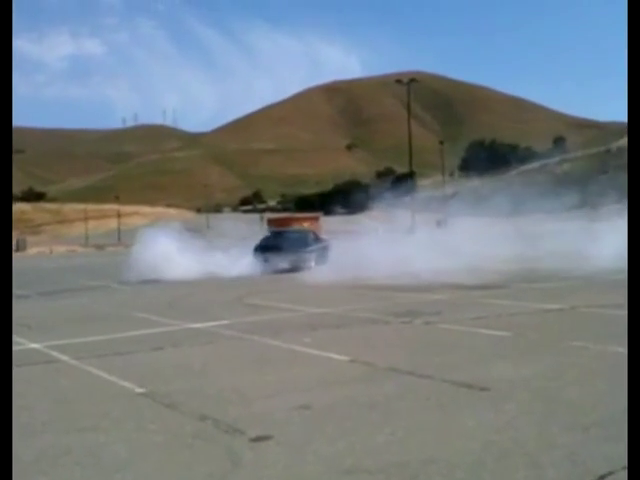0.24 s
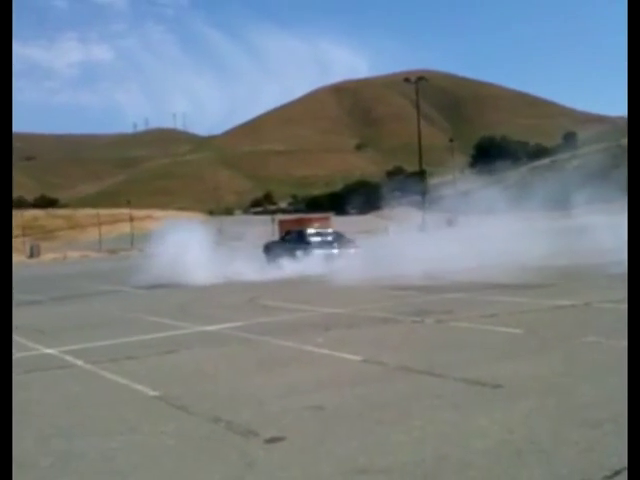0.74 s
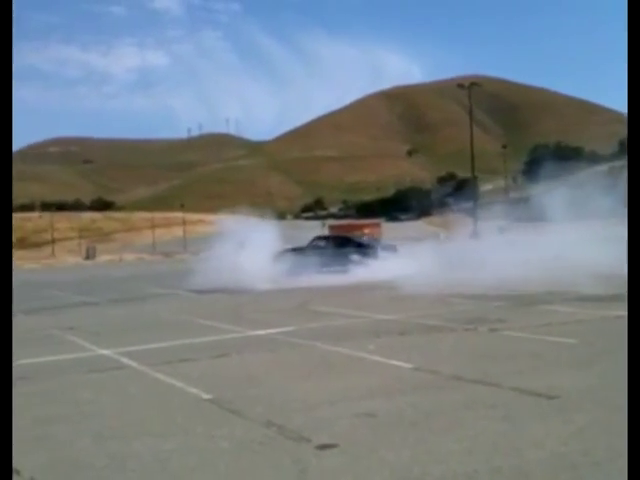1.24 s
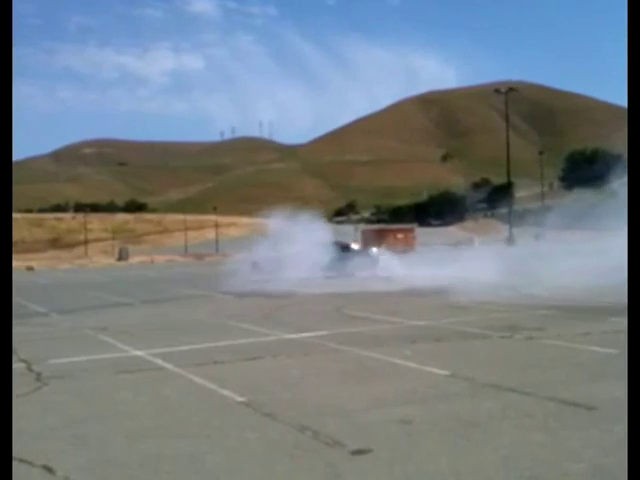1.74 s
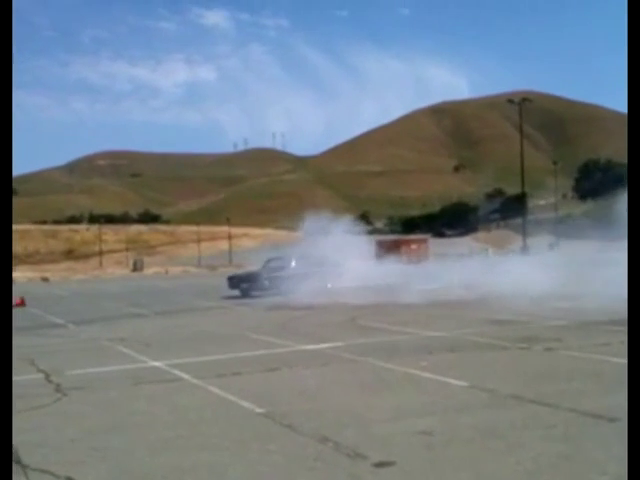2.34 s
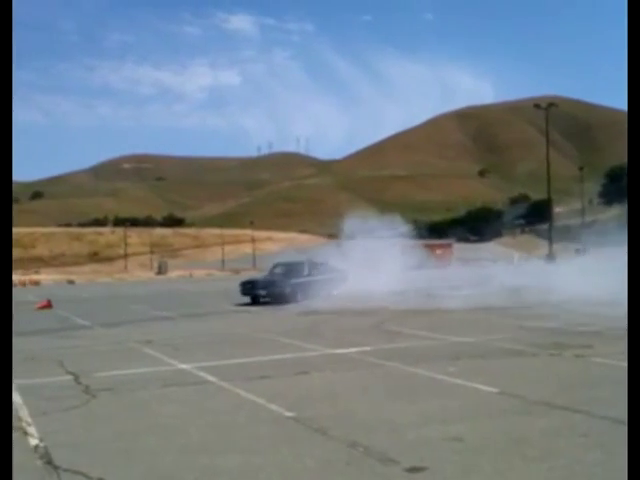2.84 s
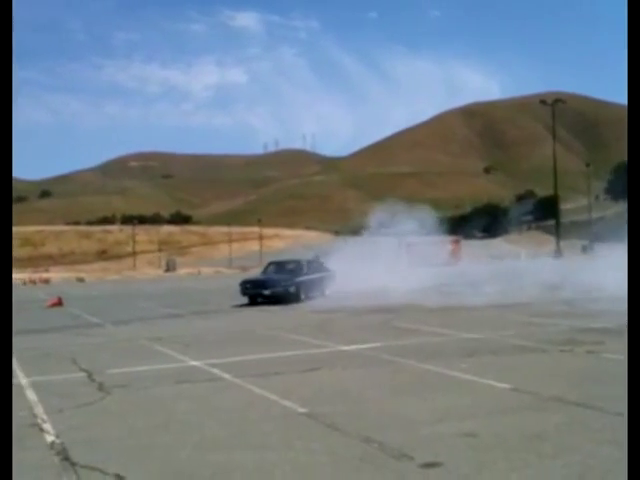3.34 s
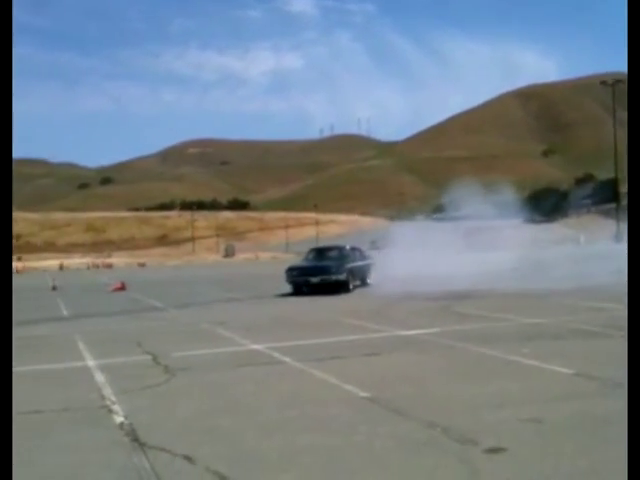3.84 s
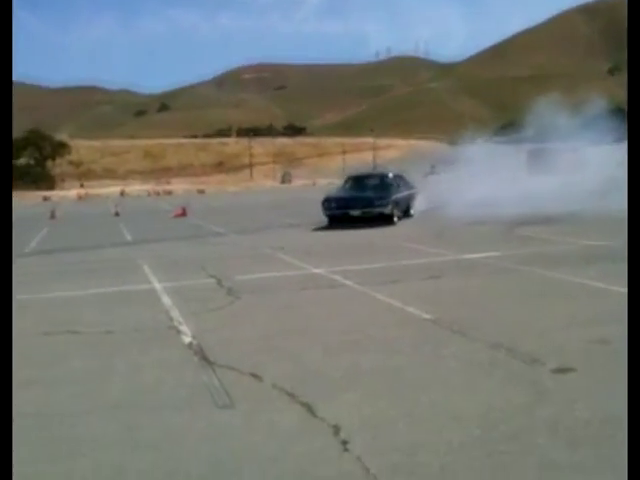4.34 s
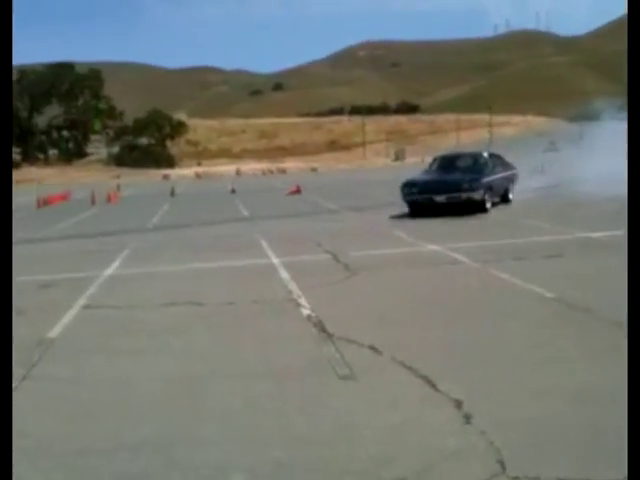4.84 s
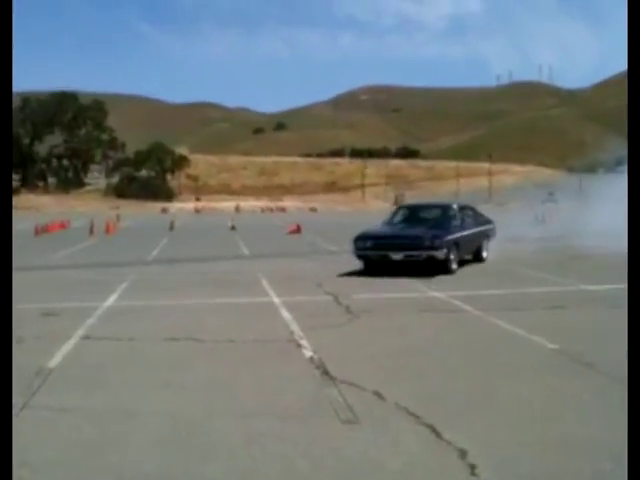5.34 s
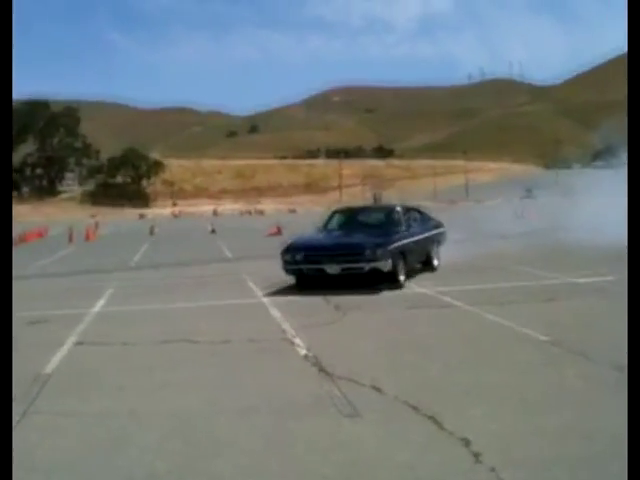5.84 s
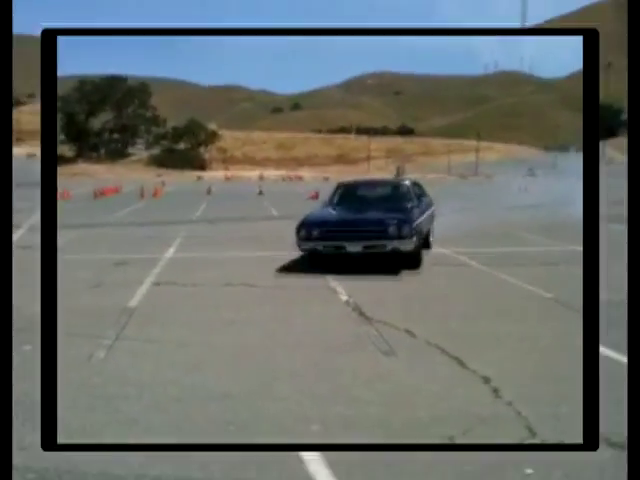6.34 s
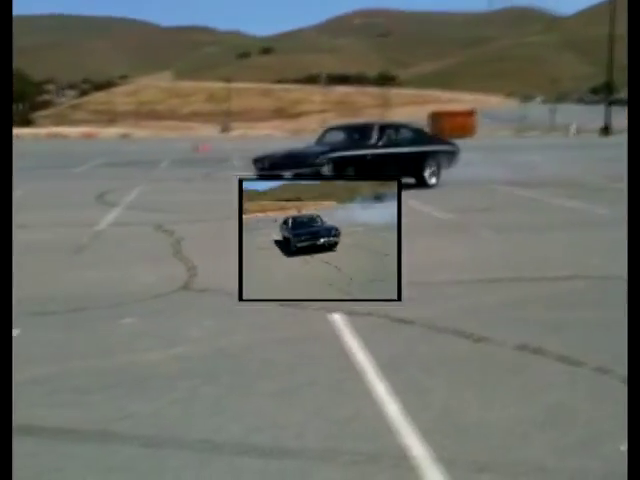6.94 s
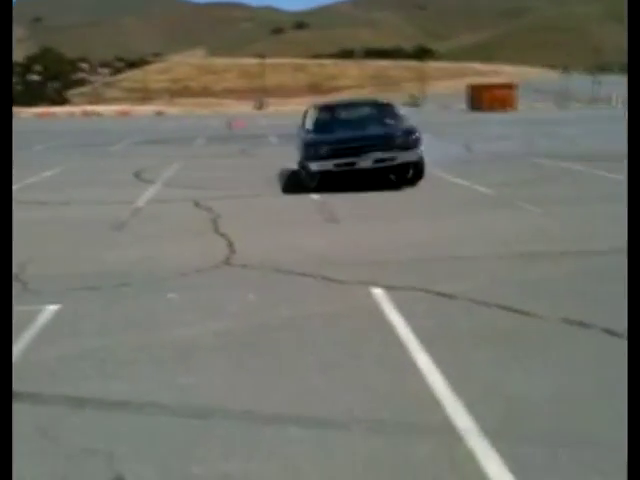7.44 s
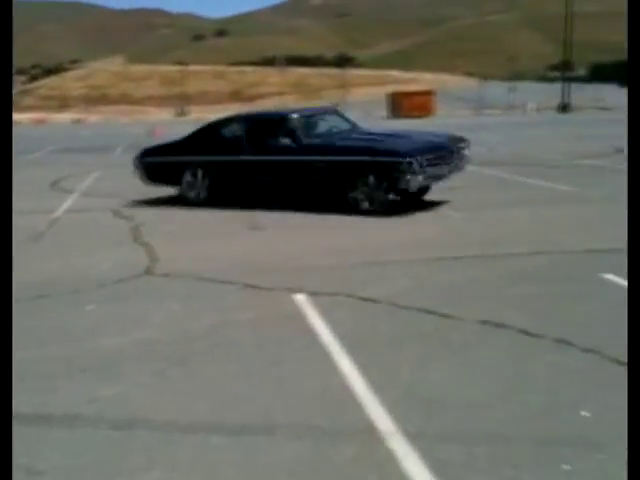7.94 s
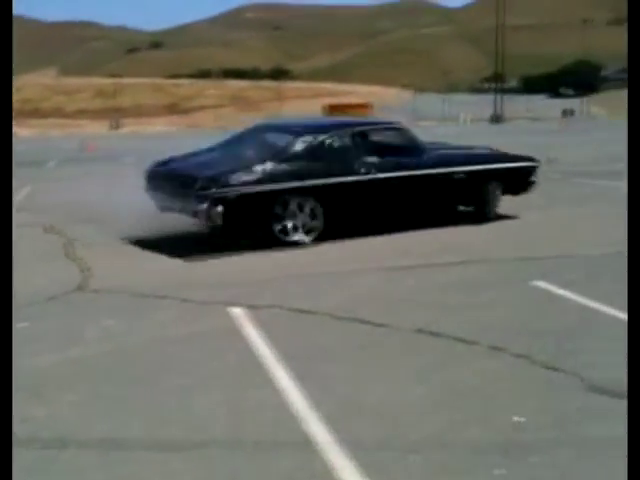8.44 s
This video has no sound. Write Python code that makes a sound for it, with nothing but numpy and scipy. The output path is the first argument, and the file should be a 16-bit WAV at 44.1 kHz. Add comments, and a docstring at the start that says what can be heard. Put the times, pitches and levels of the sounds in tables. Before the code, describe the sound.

Outdoors on an open asphalt lot, heard through a small, bass-light microphone. From 0 to about 1.4 s a V8 burbles at high steady revs while spinning tyres squeal around 800 Hz in overlapping, rough, wavering swells, with scrubbing roar and early rubber crackle. From 1.5 to 2.2 s the revs fall and the squeal weakens into quick chirps. Until 3.1 s only a faint idle and airy wash remain, with a soft hollow knock near 2.6 s. The throttle blips at 3.3-4.2 s, then low thumping idle continues, with tiny close ticks around 5 s and a brief rustle at 5.5 s. A sharper tick at 6.3 s precedes a sudden throttle surge. Short squeals come first; from 7.3 s longer screeches join a climbing engine and swelling gritty roar. The car sweeps close from 8 s, distorting, loudest as it ends at 8.7 s.

```python
"""A V8 car spins its rear tyres on an open asphalt lot, backs off to a far idle and blips the throttle; then a
car slides past close to the microphone with the engine climbing. The exhaust is a sum of engine-cycle orders,
the idle a train of ringing thumps, the squeals gliding tones of wavering strength, the roar and the open air
coloured noise. Chirps, snaps, ticks, a rustle and a knock are short tones and noise; a small microphone clips
the loudest peaks."""
import sys
import numpy as np
from scipy import signal
from scipy.fft import next_fast_len
from scipy.io import wavfile
from scipy.ndimage import uniform_filter1d

SR = 44100
rng = np.random.default_rng(int(sys.argv[2]) if len(sys.argv) > 2 else 0)


def output_pcm(signal):
    """Save a mono or channel-first signal as 16-bit PCM at the path in sys.argv[1].

    Samples are clipped to [-1, 1] before scaling.
    """
    pcm = np.clip(np.atleast_2d(signal).T, -1, 1) * 32767
    wavfile.write(sys.argv[1], SR, np.round(pcm).astype(np.int16))


N = 383211


def gain_of(db):
    """Decibels to gain."""
    return 10 ** (np.asarray(db) / 20)


def evened(x):
    """Scales to rms 1."""
    return x / np.sqrt(np.mean(abs(x) ** 2) + 1e-20)


def read(points, hz):
    """Reads a spectrum on a log-frequency axis."""
    f, value = np.transpose(points)
    return np.interp(np.log(hz + 1), np.log(f + 1), value)


def unfold(rows):
    """Start time and every further column of a table at each sample."""
    s, *columns = np.transpose(rows)
    t = np.arange(s[0], s[-1], 1 / SR)
    return s[0], [np.interp(t, s, c) for c in columns]


def add(mix, s, sound):
    """Mixes a sound in at time s."""
    part = mix[round(s * SR):][:len(sound)]
    part += sound[:len(part)]


def wander(count, width):
    """Complex noise of rms 1 whose spectrum is a bell of the given width in Hz."""
    size = next_fast_len(count)
    hz = np.fft.fftfreq(size, 1 / SR)
    bell = 1 / (1 + (2 * hz / width) ** 2)
    white = rng.standard_normal(size) + 1j * rng.standard_normal(size)
    return evened(np.fft.ifft(bell * white))[:count]


def coloured(db_field):
    """Noise from random short-time spectra under a field of levels, bins by frames."""
    a, b = rng.standard_normal(db_field.shape[::-1] + (2,)).T
    spectra = (a + 1j * b) * gain_of(db_field)
    return signal.istft(spectra, nperseg=1024, noverlap=768)[1][:N] / np.sqrt(384)


# Speed of the engine, eight firings to a cycle. Each row: time in seconds, cycles per second.
ENGINE_SPEED = [(0, 20.25), (1.06, 20.1), (1.5, 19.65), (1.62, 18.8), (1.93, 15.4), (2.1, 13.8),
                (3.3, 12.2), (3.48, 13.5), (3.76, 14.95), (4.05, 15.55), (4.2, 14.8), (4.35, 13.5),
                (6.22, 21.95), (7.33, 22.5), (7.65, 23.8), (7.88, 26.6), (8.26, 30.2), (8.47, 32.7),
                (8.69, 33.9)]


def crank():
    """Engine cycles turned so far, slightly unsteady."""
    hz = np.interp(np.arange(N + 64) / SR, *np.transpose(ENGINE_SPEED))
    return np.cumsum(hz * (1 + .0008 * wander(N + 64, 10).real)) / SR


def order_rolloff_db(hz):
    """The orders above about 700 Hz fall away: the loss in dB."""
    return 10 * np.log10(1 + (hz / 720) ** 16)


# Pulls of the throttle, one list each. Each row: time in seconds, firing tone in dB,
# all the other orders in dB (before a common 2 dB cut).
THROTTLE_PULLS = [
    [(0.0, -24, -18), (0.71, -24, -20.5), (1.02, -28, -21), (1.28, -47, -21), (1.55, -33, -24),
     (1.62, -36, -26), (1.78, -39.5, -36), (2.1, -56, -65)],
    [(3.28, -60, -58), (3.33, -59, -41), (3.65, -49, -29), (4.15, -36.5, -29), (4.27, -63, -37),
     (4.35, -55, -49)],
    [(6.24, -43, -45), (6.36, -26, -26.5), (6.88, -15, -18), (7.26, -13, -16.5), (7.61, -10.5, -23.5),
     (7.92, -18, -15.5), (8.11, -16.5, -11.5), (8.69, -15.5, -7)],
]
# How the orders of each pull beat. Each row: fan over the cycle in radians per order squared,
# scale of the random phase drift in radians, scale of the random swell in dB.
PULL_BEATS = [(.7, .9, 2.4), (.6, .35, 1.0), (.05, .45, 1.8)]
# Balance of the orders as the car stands to the microphone. Each row: multiple of the cycle rate,
# relative level in dB with the tail near, tail away, facing, side on, sweeping past.
EXHAUST_ORDERS = [(4, -35.0, -40.0, -49.0, -45.0, -25.0), (5, -31.0, -22.0, -31.0, -24.0, 0.0),
                  (6, -15.0, -17.0, -33.0, -19.0, -16.0), (7, -15.0, -7.0, -40.0, -31.0, -19.0),
                  (8, 0.0, -7.0, -7.0, 0.0, -5.0), (9, -4.0, 5.0, -6.0, -16.0, -8.0),
                  (10, -24.0, -13.0, -3.0, -21.0, -6.0), (11, -8.0, -7.0, 0.0, -12.0, -19.0),
                  (12, -3.0, -6.0, -6.0, -10.0, -23.0), (13, -10.0, -9.0, -14.0, -15.0, -16.0),
                  (14, -29.0, -24.0, -17.0, -21.0, -19.0), (15, -12.0, -7.0, -24.0, -29.0, -8.0),
                  (16, -11.0, -12.0, -21.0, -30.0, -9.0), (17, -12.0, -14.0, -12.0, -23.0, -10.0),
                  (18, -15.0, -16.0, -12.0, -30.0, -6.0), (19, -15.0, -10.0, -9.0, -29.0, -16.0),
                  (20, -3.0, -9.0, -12.0, -24.0, -14.0), (21, -11.0, -12.0, -28.0, -31.0, -19.0),
                  (22, -10.0, -12.0, -19.0, -23.0, -15.0), (23, -13.0, -11.0, -23.0, -17.0, -12.0),
                  (24, -5.0, -13.0, -16.0, -17.0, -18.0), (25, -10.0, -10.0, -14.0, -18.0, -7.0),
                  (26, -9.0, -11.0, -27.0, -20.0, -12.0), (27, -27.0, -24.0, -22.0, -21.0, -19.0),
                  (28, -15.0, -20.0, -19.0, -16.0, -20.0), (29, -13.0, -17.0, -24.0, -22.0, -26.0),
                  (30, -18.0, -21.0, -28.0, -21.0, -5.0), (32, -25.0, -25.0, -24.0, -26.0, -25.0),
                  (33, -25.0, -25.0, -19.0, -26.0, -25.0), (34, -25.0, -25.0, -19.0, -26.0, -25.0),
                  (35, -25.0, -25.0, -22.0, -26.0, -25.0)]
# How the car stands to the microphone. Each row: time in seconds, colour of the roar 0-3,
# pose of the exhaust 0-4.
CAR_POSE = [(0, 0, .2), (0.9, 0, .2), (1.25, 0, 1), (2.2, 0, .7), (3.2, 1, 2.1), (4.4, 1, 2.1),
            (6.15, 1, 3), (6.3, 2, 3), (7.5, 2, 3), (7.95, 2.75, 4), (8.1, 3, 4), (8.7, 3, 4)]
FIRING_ORDER = 8
SWEEP_FAN = .17  # the beat smears further as the car sweeps past (radians per order squared)
UNEVEN_DB, UNEVEN_WIDTH_HZ = .6, 70  # rms and width of the unevenness that roughens the burble
TWIN_ORDER, TWIN_S, TWIN_RISE_S = 18, 6.85, .25  # orders above beat twice a cycle at once, others from TWIN_S


def exhaust(rows, turns, fan, drift, swell_db):
    """Orders of the four-stroke cycle: the firing tone and the burble of unevenly spaced firings in each pipe."""
    s, (firing_db, rest_db) = unfold(rows)
    t = s + np.arange(len(rest_db)) / SR
    when, _, poses = np.transpose(CAR_POSE)
    pose = np.interp(t, when, poses)
    cycle_hz = np.interp(t[::64], *np.transpose(ENGINE_SPEED))
    turns = turns[round(s * SR):][:len(pose)]

    # order levels, on every 64th sample
    levels = {}
    for k, *pose_db in EXHAUST_ORDERS:
        if round(k) != FIRING_ORDER:
            levels[round(k)] = np.interp(pose[::64], np.arange(5), pose_db) - order_rolloff_db(k * cycle_hz)
    total = np.sqrt(sum(gain_of(db) ** 2 for k, db in levels.items() if k > FIRING_ORDER))
    uneven = gain_of(UNEVEN_DB * np.sqrt(2) * wander(len(pose), UNEVEN_WIDTH_HZ).real)
    out = gain_of(firing_db) * np.cos(2 * np.pi * FIRING_ORDER * turns + np.pi - fan * 8.5 ** 2)
    for k, db in levels.items():
        # the orders peak at different points of the cycle
        sweep = SWEEP_FAN * np.maximum(pose - 3, 0)
        lead = np.pi - fan * (k - 16.5) ** 2 - sweep * (k - FIRING_ORDER) ** 2
        # side on and past, both banks beat alike: odd orders shift by a quarter turn
        twin = 1 if k > TWIN_ORDER else np.clip((t - TWIN_S) / TWIN_RISE_S, 0, 1)
        lead = lead + np.pi / 2 * (k % 2) * twin * (pose >= 3)
        # each order swells and drifts on its own, in a width of 3 Hz
        sway = wander(len(db), 64 * 3)
        lead = lead + drift * np.interp(t, t[::64], sway.imag)
        size = np.repeat(gain_of(db + swell_db * sway.real) / total, 64)[:len(pose)]
        out += gain_of(rest_db - 2.0) * uneven * size * np.cos(2 * np.pi * k * turns + lead)
    return s, np.sqrt(2) * out * signal.windows.tukey(len(pose), .02)


# Squeals of slipping tread, each swelling to a peak and fading while its pitch glides. Each row: start, peak
# and end in seconds, lowest patch at start and end in Hz, level at start, peak and end in dB, step up to the
# next patch in Hz, step in dB, and where overtones sound their relative level in dB (before a 4.5 dB lift).
TYRE_SQUEALS = [(0.0, 0.1, 0.34, 810, 790, -10, -8, -12, 46, -2.5, -14),
                (0.33, 0.42, 0.6, 805, 810, -14, -12, -17, 45, -3.5, -12),
                (0.6, 0.68, 0.82, 800, 800, -14, -13, -19, 45, -6, -17),
                (0.8, 0.88, 0.97, 790, 785, -19, -18, -16, 45, -4, -10),
                (0.95, 1.03, 1.28, 790, 745, -15, -17, -26, 48, -5, -25),
                (1.28, 1.39, 1.44, 735, 750, -21, -18, -25, 25, -4, -22),
                (1.46, 1.57, 1.66, 720, 745, -33, -29, -33, 45, -3, -14),
                (1.68, 1.73, 1.8, 680, 690, -34, -27, -34, 40, -5),
                (0.0, 0.4, 1.6, 1110, 1110, -35, -34, -41, 25, -1),
                (1.69, 1.74, 1.79, 1320, 1250, -36, -31, -32, 20, -5),
                (1.78, 1.85, 2.23, 1195, 1190, -33, -31, -36, 24, -3),
                (1.82, 2.12, 2.2, 1800, 1810, -48, -43, -48, 22, -2),
                (1.76, 2.2, 2.32, 605, 625, -33, -36, -50, 25, -3),
                (6.26, 6.35, 6.42, 860, 880, -44, -35, -32, 14, -9),
                (6.41, 6.45, 6.57, 903, 955, -29, -21, -31, 12, -12),
                (6.58, 6.7, 6.75, 865, 925, -33, -26, -32, 16, -8),
                (6.8, 6.98, 7.03, 865, 905, -33, -29, -33, 20, -6),
                (7.3, 7.42, 7.5, 665, 670, -25, -18, -20, 25, 4, -16),
                (7.48, 7.62, 7.96, 650, 625, -19, -16, -11, 44, 2, -14),
                (7.59, 7.64, 7.69, 755, 755, -20, -14, -20, 10, -9),
                (7.66, 7.71, 7.76, 705, 710, -20, -15, -20, 10, -9),
                (7.95, 8.03, 8.16, 630, 660, -9, -7, -10, 36, 1.5, -19),
                (8.15, 8.28, 8.38, 720, 705, -9, -4, -11, 22, -3, -19),
                (8.33, 8.42, 8.48, 765, 780, -14, -10, -15, 22, -2),
                (7.4, 7.55, 7.8, 1085, 1110, -32, -25, -22, 20, .1),
                (7.6, 7.65, 7.7, 1530, 1530, -32, -26, -32, 15, .1),
                (7.9, 8.32, 8.42, 1560, 1590, -21, -18, -25, 26, 1),
                (7.8, 7.91, 7.97, 1300, 1260, -22, -15, -20, 18, -6),
                (8.0, 8.13, 8.19, 1285, 1260, -19, -14, -17, 18, -6),
                (8.36, 8.4, 8.45, 965, 980, -15, -11, -13, 25, -8),
                (8.45, 8.51, 8.7, 975, 1000, -8, -4, -12, 25, -9)]
# Overtones of the kinked slip. Each row: multiple of the pitch, relative level in dB.
SLIP_OVERTONES = [(2, -3), (3, -19), (4, -22)]
KINK_DB, KINK_WIDTH_HZ = 2.5, 30  # overtones come and go in bursts: rms and width
STEADY_HZ = 32  # patches closer in pitch than this hold their grip more steadily


def squeal(start, peak, end, start_hz, end_hz, start_db, peak_db, end_db, step_hz, step_db, *overtones_db):
    """Four patches of tread stick and slip at neighbouring pitches, each wavering as its grip comes and goes."""
    s, (level_db,) = unfold([(start, start_db), (peak, peak_db), (end, end_db)])
    hz = np.linspace(start_hz, end_hz, len(level_db))
    kink_db = level_db + KINK_DB * np.sqrt(2) * wander(len(hz), KINK_WIDTH_HZ).real
    out = np.zeros(len(hz))
    shares = evened(gain_of(step_db * np.arange(4))) / 2
    for patch, share in enumerate(shares):
        patch_hz = hz + step_hz * (patch + .4 * wander(len(hz), 60).real)
        angle = 2 * np.pi * np.cumsum(patch_hz) / SR
        grip = evened(abs(STEADY_HZ / step_hz + wander(len(hz), 45)) ** 0.85)
        out += share * gain_of(level_db) * grip * np.cos(angle)
        overtone_grip = evened(grip ** 1.4)
        for all_db in overtones_db:
            for k, db in SLIP_OVERTONES:
                size = share ** 2 * gain_of(kink_db + all_db + db + 4.5)
                out += size * overtone_grip * np.cos(round(k) * angle)
    return s, out * signal.windows.tukey(len(hz), .08)


# Roar of scrubbing rubber and rushing exhaust. Each row: time in seconds,
# level in dB of the band from 2 to 5 kHz (before a common 26 dB lift).
ROAR_LEVEL = [(0.0, -29), (0.53, -36), (1.39, -38), (1.78, -42.5), (1.85, -40), (2.17, -43.5),
              (2.38, -55.5), (3.25, -54.5), (3.48, -44.5), (3.55, -43), (3.64, -45.5), (3.75, -42),
              (3.84, -44), (4.01, -45), (4.2, -50), (4.66, -58), (5.87, -48.5), (6.25, -47.5),
              (6.36, -39.5), (6.75, -28.5), (7.24, -25.5), (7.5, -29), (7.99, -19.5), (8.69, -13)]
# Its colour while the tyres spin, through the far idle and blip, side on, and sweeping past, one list each.
# Each row: frequency in Hz, relative density in dB per Hz.
ROAR_COLOURS = [
    [(330, -42), (560, -14.5), (709, -8), (781, -14), (976, -9), (1170, -17.5), (1380, -17.5),
     (1560, -16.5), (2040, -26.5), (3130, -20), (4080, -32), (7610, -38), (15400, -61)],
    [(330, -45), (560, -19), (815, -6.5), (976, -17.5), (1140, -9), (1720, -19), (2920, -14.5), (3860, -23),
     (7510, -25.5), (12700, -41), (15400, -52)],
    [(260, -57), (450, -9), (562, -1.5), (801, -6.5), (1140, -5.5), (1410, -13), (1650, -9.5), (1920, -18),
     (3080, -14), (3630, -14), (3950, -20), (4730, -19), (5300, -30), (6690, -23.5), (8900, -28),
     (9940, -39.5), (15400, -51)],
    [(240, -42), (400, -51), (560, -6), (772, -4), (859, -9), (1000, -3), (1420, -12), (1610, -8),
     (1930, -16.5), (2120, -11.5), (8380, -32), (15400, -47.5)],
]
# The low part of the roar: one relative density in dB per Hz for each colour.
ROAR_BOOM_DB = [-13, -3, -12, -9]
# Dips heard side on. Each row: centre in Hz, width in Hz, depth in dB.
SIDE_DIPS = [(1396, 43, -18), (1885, 105, -12), (2340, 74, -4.5), (7350, 270, -10)]
PATCHY_DB, FLUTTER_DB = 1.0, .6  # rms unevenness over time and frequency, and over time alone


def roar():
    """Wide noise whose colour follows the pose of the car, patchy and fluttering with the slip."""
    t = np.arange(N // 256 + 5) * 256 / SR
    hz = np.fft.rfftfreq(1024, 1 / SR)
    dips = sum(db * np.exp(-((hz - f) / w) ** 2) for f, w, db in SIDE_DIPS)
    shapes = np.array([read(c, hz) for c in ROAR_COLOURS]) + np.outer([0, 0, 1, 0], dips)
    low = 1 / (1 + (hz / 450) ** 6) / (1 + (125 / (hz + 1)) ** 12)
    boom = np.outer(gain_of(ROAR_BOOM_DB) ** 2, low)
    shapes = 10 * np.log10(gain_of(shapes) ** 2 * (hz > 300) + boom)
    # equal power from 2 to 5 kHz in every colour
    shapes -= 10 * np.log10((gain_of(shapes[:, 46:116]) ** 2).sum(1))[:, None]
    pose = np.interp(t, *np.transpose(CAR_POSE)[:2])
    blend = np.clip(1 - abs(pose[:, None] - np.arange(4)), 0, 1)
    colour = (blend @ shapes).T
    patches = rng.standard_normal((len(t), 513)).T
    patches = evened(uniform_filter1d(uniform_filter1d(patches, 14, 0), 12, 1))
    flutter = evened(uniform_filter1d(rng.standard_normal(len(t)), 6))
    level_db = np.interp(t, *np.transpose(ROAR_LEVEL)) + 26
    return coloured(colour + level_db + PATCHY_DB * patches + FLUTTER_DB * flutter)


GRIT_DB, GRIT_S = .8, .003  # strength and length of the spits


def grit():
    """Gain that jumps in short spits, so that the roar crackles."""
    spits = uniform_filter1d(rng.exponential(1, N) ** 3, round(GRIT_S * SR))
    return evened(gain_of(GRIT_DB * np.minimum(evened(spits - spits.mean()), 4)))


def puffs(turns):
    """Gain of the roar that steps with the eight firings of the cycle, softly."""
    slot_db = np.array([0.7, -1.5, -1.5, 0.3, -1.5, -0.8, -0.76, -1.4])
    slot = (8 * turns[:N]).astype(int) % 8
    return gain_of(uniform_filter1d(slot_db[slot], 100))


# Crackle of tearing tread. Each row: time in seconds, level in dB.
TREAD_RASP = [(0.0, -40), (0.18, -31.5), (0.42, -39.5), (0.55, -56), (1.05, -49)]
RASP_T60, RASP_PER_S = .016, 420  # decay of a snap by 60 dB in seconds, mean snaps per second


def rasp():
    """Tread tears loose in short bright snaps of uneven size and pitch."""
    s, (level_db,) = unfold(TREAD_RASP)
    count = len(level_db)
    t = np.arange(800) / SR
    kind = rng.integers(0, 12, count)
    size = gain_of(3.5 * np.minimum(rng.exponential(1, count), 4))
    snaps = (rng.random(count) < RASP_PER_S / SR) * size
    out = np.zeros(count)
    for k, hz in enumerate(np.linspace(2850, 3750, 12)):
        ring = gain_of(-60 * t / RASP_T60) * np.sin(2 * np.pi * hz * t)
        out += signal.oaconvolve(snaps * (kind == k), ring)[:count]
    return s, gain_of(level_db) * evened(out)


# The wheel hops as it slows and the squeal breaks into chirps; the last is a lone faint blip.
# Each row: start in seconds, level in dB (the peak comes out 3 dB lower), pitch in Hz.
WHEEL_CHIRPS = [(1.726, -21.5, 1420), (1.823, -20, 1225), (1.8592, -23, 1240), (1.888, -21, 1236),
                (1.9634, -22, 1180), (2.001, -16, 1247), (2.031, -17, 1235), (2.0775, -21, 1215),
                (2.137, -24, 1284), (2.1733, -22, 1246), (5.345, -35, 1190)]


def chirps():
    """Each hop grips for a moment: a short swelling note."""
    out = np.zeros(N)
    t = np.arange(1800) / SR
    swell = t / 0.0056 * np.exp(1 - t / 0.0039)
    for s, db, hz in WHEEL_CHIRPS:
        add(out, s, gain_of(db) * swell * np.sin(2 * np.pi * hz * t))
    return out


# Idling and coasting far off, one list a stretch. Each row: time in seconds,
# level of the thumps in dB (before a common 1 dB cut).
FAR_IDLE = [
    [(1.95, -62), (3.0, -61), (3.12, -45), (3.29, -48), (3.34, -36), (3.46, -44)],
    [(4.28, -48), (4.38, -39.5), (5.06, -47.5), (5.29, -43), (6.3, -45)],
]
# Resonances of the pipe. Each row: frequency in Hz, width in Hz, relative level in dB.
PIPE_RINGS = [(135, 50, 0), (165, 60, -5), (245, 70, -9), (340, 110, -10)]
IDLE_HZ, IDLE_TONE_DB = 58, -57  # firings per second, peak level of the hum


def idle(rows):
    """Slow firings of uneven strength and spacing thump the pipe; a hum at their rate fades in from 4.7 s."""
    s, (level_db,) = unfold(rows)
    turns = IDLE_HZ * np.arange(len(level_db)) / SR
    late = .3 * wander(len(turns), 60).real
    strength = gain_of(2.5 * rng.standard_normal(len(turns)))
    fired = abs(np.diff(np.floor(turns + late), prepend=0)) * strength
    t = np.arange(3000) / SR
    ring = sum(gain_of(db) * np.exp(-np.pi * w * t) * np.sin(2 * np.pi * f * t) for f, w, db in PIPE_RINGS)
    thumps = signal.oaconvolve(fired, ring)[:len(turns)]
    thumps = signal.sosfilt(signal.butter(6, 118, "high", fs=SR, output="sos"), thumps)
    fade = np.clip(turns / IDLE_HZ + s - 4.7, 0, 1)
    hum = gain_of(IDLE_TONE_DB) * np.sin(2 * np.pi * turns) * fade
    return s, (gain_of(level_db - 1.0) * evened(thumps) + hum) * signal.windows.tukey(len(turns), .1)


# Ticks by the microphone. Each row: start in seconds, starting level in dB, pitch in Hz.
NEAR_TICKS = [(2.9781, -46, 3060), (3.3094, -41, 3000), (4.4794, -43, 3240), (4.9716, -38, 5150),
              (5.0394, -47, 3220), (5.0947, -32, 4140), (5.1076, -32, 5340), (6.2786, -27, 3260),
              (6.279, -23, 1510), (6.2827, -28, 2800)]
# A short bright rustle. Each row: time in seconds, level in dB (before a 0.5 dB lift).
RUSTLE = [(5.54, -62), (5.578, -44), (5.65, -60)]
# A hollow knock. Each row: frequency in Hz, starting level in dB (before a soft attack), 60 dB decay in seconds.
HOLLOW_KNOCK = [(403, -33, 0.26), (240, -26, .05)]
KNOCK_S = 2.577  # start of the knock


def near_sounds():
    """Small decaying ticks, a noise rustle and a two-tone knock close to the microphone."""
    out = np.zeros(N)
    t = np.arange(9000) / SR
    for s, db, hz in NEAR_TICKS:
        add(out, s, gain_of(db - 60 * t / 0.005) * np.sin(2 * np.pi * hz * t))
    s, (level_db,) = unfold(RUSTLE)
    bright = np.diff(rng.standard_normal(len(level_db) + 1))
    hiss = evened(uniform_filter1d(bright, size=2))
    add(out, s, gain_of(level_db + 0.5) * hiss * signal.windows.tukey(len(hiss), .3))
    knock = sum(gain_of(db - 60 * t / t60) * np.sin(2 * np.pi * hz * t) for hz, db, t60 in HOLLOW_KNOCK)
    add(out, KNOCK_S, knock * np.minimum(t / 0.0028, 1))
    return out


# Wash of the open air. Each row: frequency in Hz, relative density in dB per Hz.
OPEN_AIR = [(62, -54), (105, 4), (434, -7.5), (513, -3.5), (764, -8.5), (1070, -5.5), (1650, -12.5),
            (2260, -11), (3230, -15.5), (3580, -13), (15400, -28.5)]
AIR_DB = -46.5  # rms level


def air():
    """The steady wash of the open lot: shaped noise without its deep bass."""
    hz = np.fft.rfftfreq(1024, 1 / SR)
    wash = coloured(np.repeat(read(OPEN_AIR, hz)[:, None], N // 256 + 5, 1))
    wash = signal.sosfilt(signal.butter(6, 110, "high", fs=SR, output="sos"), wash)
    return gain_of(AIR_DB) * evened(wash)


def scene():
    """Car, lot and the small sounds near the microphone."""
    turns = crank()
    mix = roar() * grit() * puffs(turns) + air() + near_sounds() + chirps()
    add(mix, *rasp())
    for rows, beat in zip(THROTTLE_PULLS, PULL_BEATS):
        add(mix, *exhaust(rows, turns, *beat))
    for rows in FAR_IDLE:
        add(mix, *idle(rows))
    for row in TYRE_SQUEALS:
        add(mix, *squeal(*row))
    return mix[None]


EDGE_HZ = 15600  # upper band limit


def record(dry):
    """The small microphone drops the deep bass, the loudest peaks clip at full scale; then the band limit."""
    thin = signal.sosfilt(signal.butter(2, 75, "high", fs=SR, output="sos"), dry)
    band_limit = signal.firwin(511, EDGE_HZ, window=("kaiser", 9), fs=SR)
    return signal.oaconvolve(np.clip(thin, -1, 1), band_limit[None], "same")


dry = scene()
out = record(dry)
output_pcm(out)
```